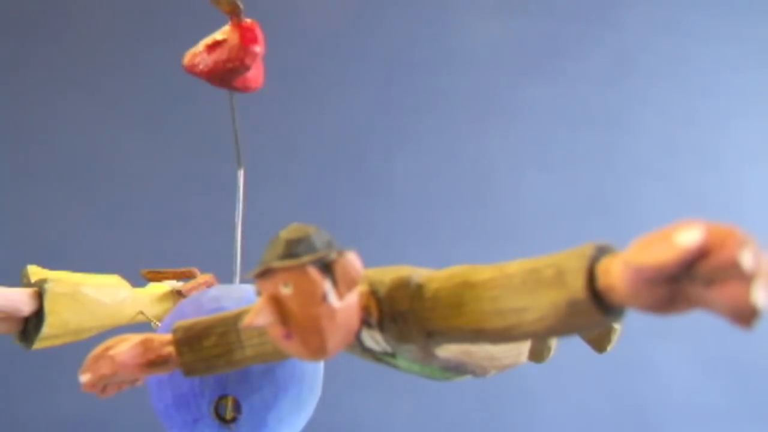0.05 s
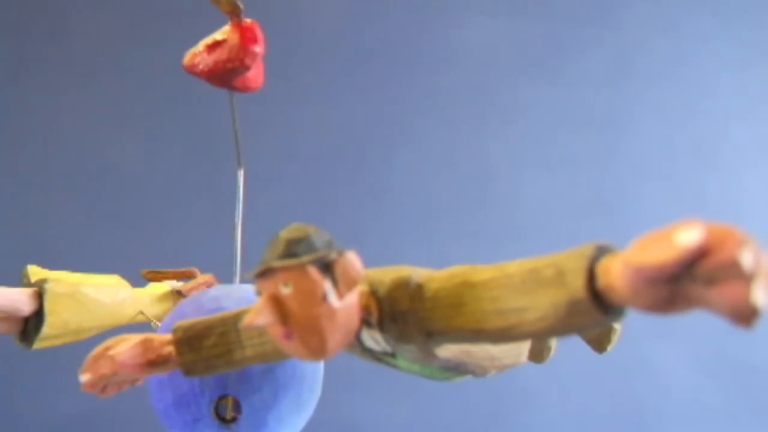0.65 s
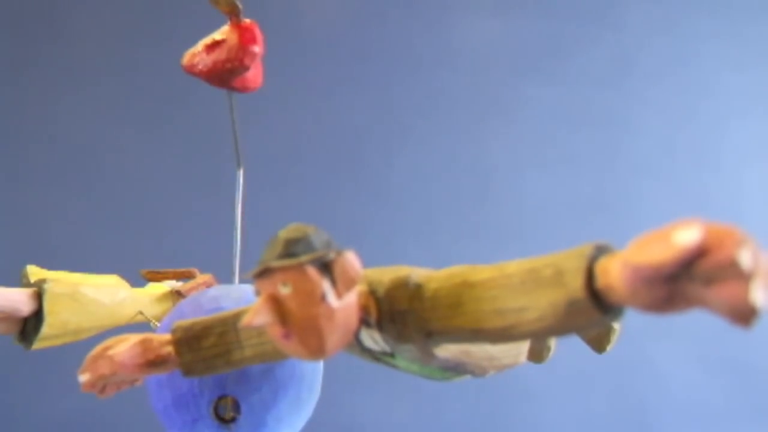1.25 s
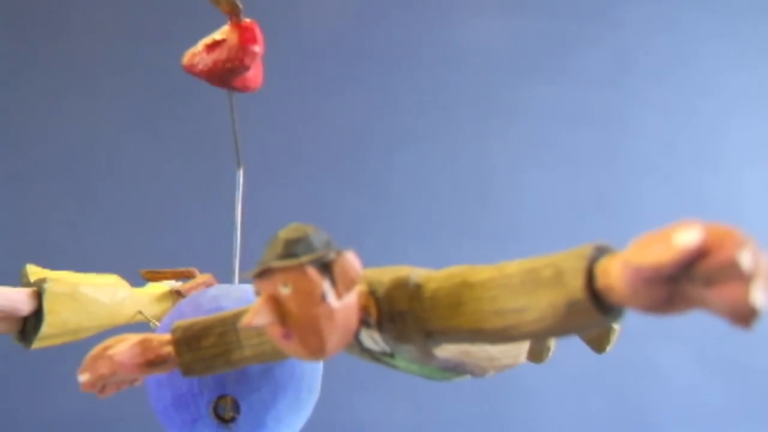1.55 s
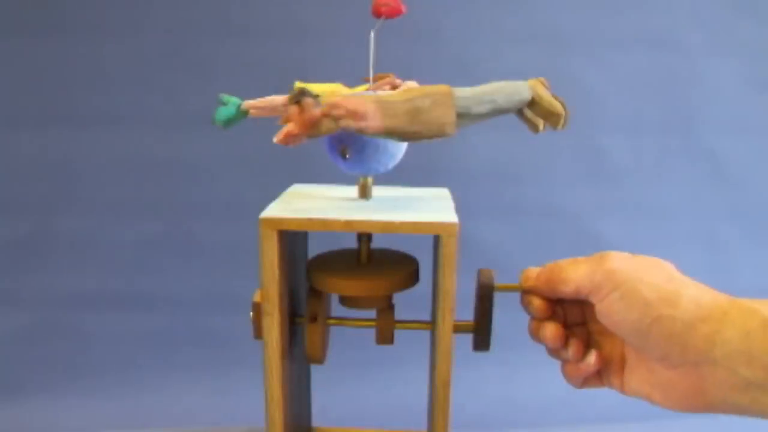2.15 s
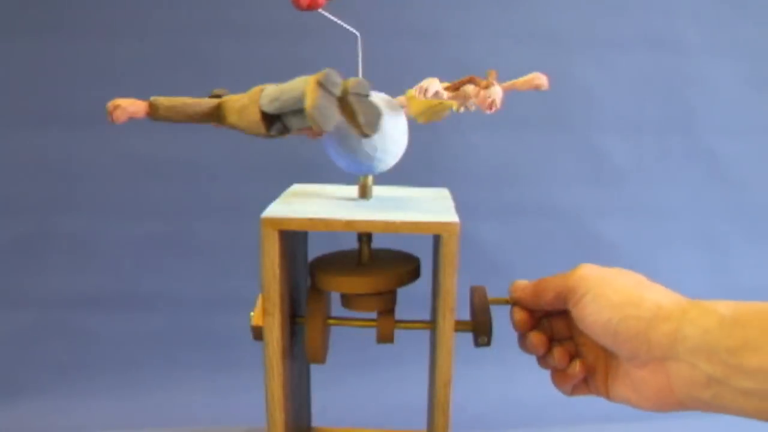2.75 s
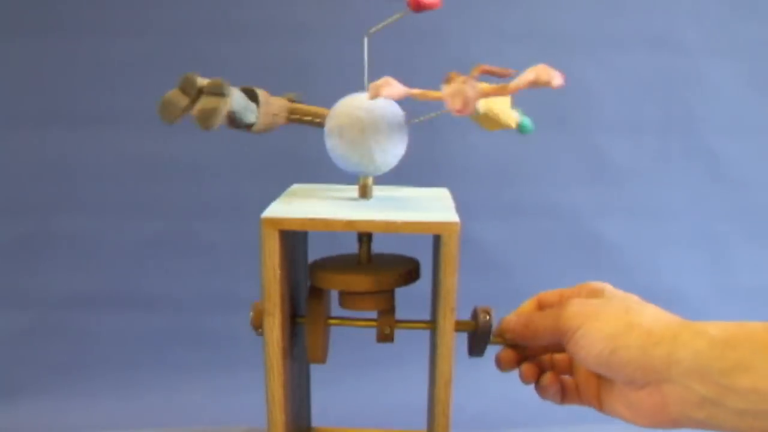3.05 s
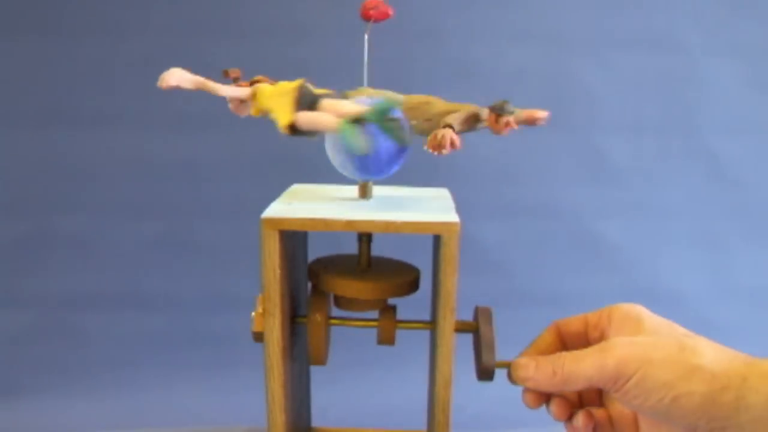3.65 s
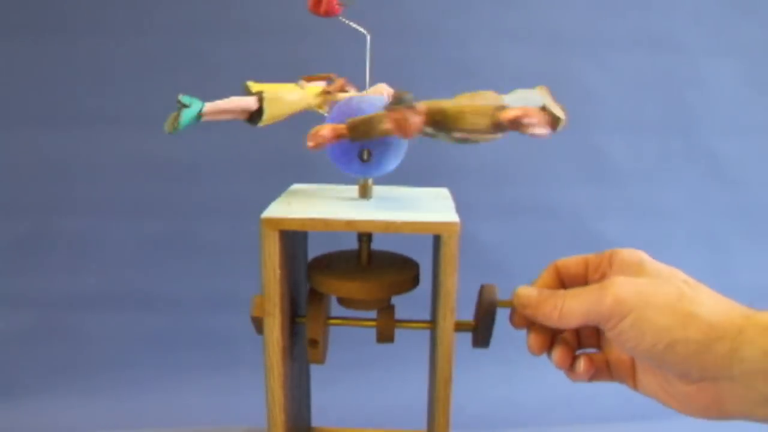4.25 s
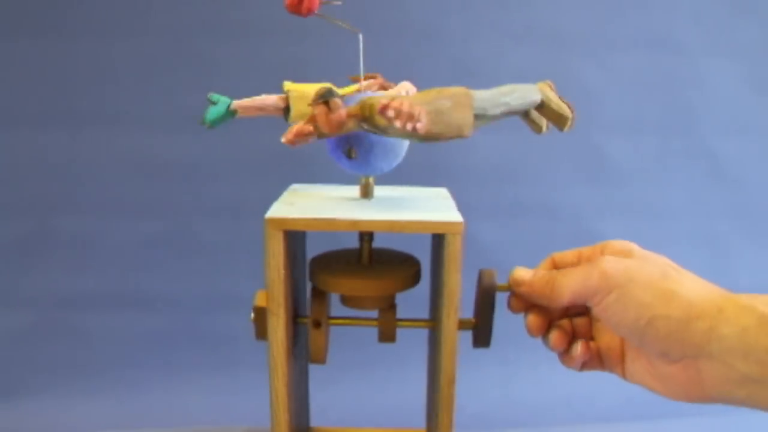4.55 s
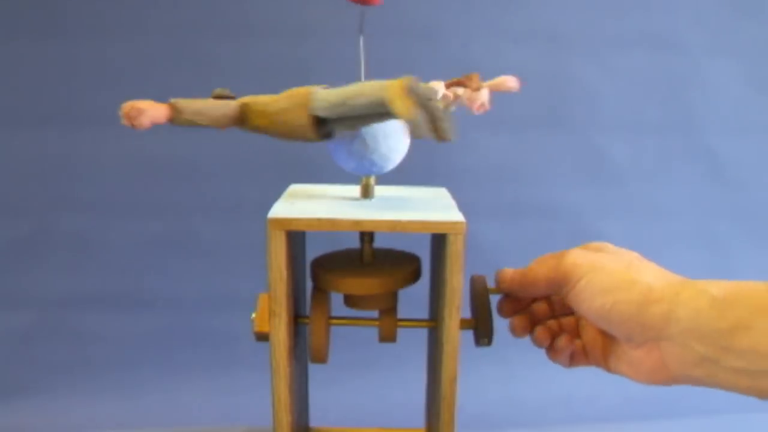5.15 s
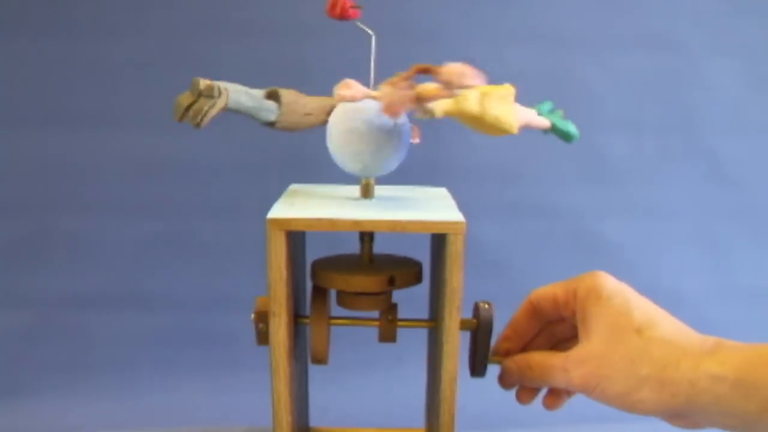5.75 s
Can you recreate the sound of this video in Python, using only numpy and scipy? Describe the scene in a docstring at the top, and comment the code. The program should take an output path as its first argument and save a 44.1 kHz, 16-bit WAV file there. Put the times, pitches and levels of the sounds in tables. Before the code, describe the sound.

A small mono microphone in a quiet room picks up steady hiss, then close handling noise: sliding skin, tiny squeaks, low thuds and loud, sharp clicks on its plastic case. After a short fade out and back in, a wooden automaton is cranked by hand. Its wheels rub faintly with occasional soft bumps and clacks, and thin wires touch in scattered little metallic ticks and chirps until the end.

```python
"""A hand-cranked wooden automaton, heard by a small mono camera. At first there is only a faint hiss.
After one second, fingers rub, knock, squeak and bump on the camera's case, and the grip makes it creak.
Near two seconds the sound fades out and in again. Then the crank starts to turn: wooden wheels
rub, bump and clack softly, while wire parts catch on each other with little ticks and chirps."""
import sys
import numpy as np
from scipy.fft import rfft, irfft, next_fast_len
from scipy.io import wavfile
from scipy.ndimage import map_coordinates

SR = 44100
rng = np.random.default_rng(int(sys.argv[2]) if len(sys.argv) > 2 else 0)


def dump_mix(stems):
    """Bounce the given channels to the path in sys.argv[1] as a 16-bit WAV at rate SR."""
    frames = np.atleast_2d(stems).T  # one column per channel
    limited = np.clip(frames, -1, 1)  # hard clip at full scale
    pcm = np.round(limited * 32767).astype(np.int16)
    wavfile.write(sys.argv[1], SR, pcm)


N = 255780

# Tone of the background hiss, of sliding skin and of its fine hiss.
# Each row: frequency in Hz, strength in dB.
HISS_TONE = [(12, -2), (28, 1.5), (60, -0.5), (150, -2), (370, -1), (650, -2.5), (1000, -4.5), (1500, -6),
             (2100, -7), (3000, -8.5), (4500, -10), (6000, -10), (7000, -13.5), (8000, -17)]
SKIN_TONE = [(30, -2.5), (110, -5.5), (300, -1), (600, -4.5), (1350, -2.5), (1900, -2.5), (2400, -3),
             (3100, -4.5), (3800, -6), (5000, -10.5), (7200, -15), (9000, -25)]
SKIN_HISS_TONE = [(1500, -17.5), (3500, -7), (4800, 0), (6600, 1.5), (8000, -3.5)]
# Finger strokes, the first a long light touch.
# Each row: start in seconds, level in dB, hold in seconds, hiss in dB compared with the stroke.
FINGER_STROKES = [(1.0, -47.5, 0.7043, -7.5), (1.1, -42, 0.062, 3.5), (1.255, -48, 0.017, -0.5),
                  (1.405, -46.5, .015, 1), (1.485, -42.5, 0.022, -2.5), (1.525, -37.5, 0.0207, -13.5),
                  (1.785, -49, .03, -7), (1.835, -45, .008, -8)]
# Knocks on the case. A fade time (t60 in the code) is how long a sound takes to drop 60 dB. Each row:
# start in seconds, level in dB, pitch in Hz, fade time in seconds, snap in dB compared with the knock.
CASE_KNOCKS = [(1.0055, -23.5, 2000, .0023, -20.5), (1.5366, -6.5, 896, .0033, -34),
               (1.5405, -18, 900, 0.0041, -21), (1.547, -14, 1310, .0086, -5),
               (1.5602, -22, 1900, .004, -15), (1.6575, -28.5, 1170, .017, -6),
               (1.8039, -21, 4920, 0.0025, -17.5), (1.8725, -3, 1810, .0031, -10.5),
               (1.8806, -18, 1640, .007, -8.5), (1.9336, -7.5, 2100, 0.0033, -25.5)]
# The notes the case rings at, called its modes. Each row: pitch in Hz, width in Hz, strength in dB.
CASE_MODES = [(440, 210, -5), (934, 140, -2.5), (1418, 296, 2.5), (2018, 240, -0.5), (2293, 220, -2),
              (3623, 680, -1), (4377, 330, -5.5), (5592, 380, -6), (7168, 550, -1)]
# Skin squeaks. Each row: start in seconds, level in dB, hold in seconds, first pitch in Hz,
# glide in Hz per second.
SKIN_SQUEAKS = [(1.031, -39.5, .008, 1250, -1000), (1.131, -42.5, .004, 1184, 600)]
# Bumps of hand and wood. Each row: start in seconds, level in dB, pitch in Hz, fade time in seconds.
DULL_BUMPS = [(1.092, -40, 229, 0.063), (1.106, -33.5, 124.9, 0.057), (1.434, -40, 250, .053),
              (1.537, -35.5, 256, 0.092), (1.554, -33, 198.5, 0.11), (1.872, -43, 291.4, .06),
              (3.022, -43, 299, 0.155), (3.058, -42.5, 170.4, .069), (3.11, -48, 141, .15),
              (3.239, -49.5, 155.2, 0.14), (4.899, -40.5, 199.5, 0.0626), (5.272, -43.5, 689, 0.066)]
# Creaks of the case. Each row: start in seconds, level in dB, hold in seconds.
GRIP_CREAKS = [(1.829, -38.5, .025), (1.884, -40.5, .018)]
# Tone of the wheels' rumble and of their dry scrape. Each row: frequency in Hz, strength in dB.
RUMBLE_TONE = [(30, -4.5), (110, 2.5), (250, -3.5), (400, -0.5), (700, -4.5), (1500, -13), (3000, -21.5),
               (9000, -38)]
SCRAPE_TONE = [(200, -19.5), (1000, -4), (1700, 2.5), (2400, -4), (3000, 2.5), (3800, -6.5), (5000, -5),
               (6100, 1), (7500, -7.5)]
# Long rubs as the wheels swing the figures round.
# Each row: start in seconds, rumble in dB, hold in seconds, scrape in dB compared with the rumble.
WHEEL_RUBS = [(2.97, -55, 0.419, -4), (4.45, -59.5, .18, 6.5), (5.22, -60.5, .42, -1)]
# Wire ticks. Each row: start in seconds, level in dB, fade time in seconds, second wire's share (0 to 1).
WIRE_TICKS = [(2.512, -43.5, 0.044, 0.97), (2.53, -45, .054, .9), (2.775, -36.5, 0.0345, .9),
              (2.863, -46.5, .03, 1), (3.0202, -33.5, 0.043, 0.04), (3.031, -33.5, .021, 0),
              (3.069, -43, .015, 0.04), (3.099, -40.5, 0.0305, 0), (3.257, -41, 0.0464, .2),
              (3.281, -45, .036, .2), (3.35, -46, .02, .2), (3.372, -43.5, 0.032, .3),
              (3.389, -43.5, .02, .7), (3.4737, -37.5, 0.0148, 0.94), (3.924, -43, 0.0355, 1),
              (4.462, -44.5, .03, .2), (4.519, -43, .022, .2), (5.104, -43.5, .04, .3),
              (5.113, -44, .04, .7), (5.142, -48, .035, 0.5), (5.171, -44.5, 0.0173, .5),
              (5.257, -48, .025, 0), (5.296, -41.5, 0.017, .5), (5.379, -44.5, 0.046, 0.2),
              (5.577, -49, .04, .5)]
# The notes the two wires and the wood ring at. Each row: pitch in Hz, width in Hz, strength in dB.
FIRST_WIRE_MODES = [(3374, 110, -6), (4832, 100, -6), (5882, 105, 0), (7163, 200, -5.5)]
SECOND_WIRE_MODES = [(4870, 150, -5), (5352, 230, 0), (5932, 130, -6.5), (6556, 250, -1.5), (6912, 150, -4),
                     (7246, 150, 0)]
WOOD_MODES = [(330, 150, -4), (716, 140, 1), (1201, 340, -1.5), (1538, 280, -3), (1880, 250, -1.5),
              (3100, 500, -13.5)]
# Wheel clacks. Each row: start in seconds, level in dB, favoured pitch in Hz, fade time in seconds.
WHEEL_CLACKS = [(3.038, -46, 2100, 0.079), (3.392, -48, 1500, .04), (4.69, -48, 1794, 0.078),
                (4.899, -44.5, 1200, 0.115), (5.562, -45.5, 1096, 0.108), (5.578, -47.5, 1345, 0.24)]
# How the camera dulls high sounds. Each row: frequency in Hz, change in dB.
CAMERA_TREBLE = [(7000, 0), (7400, -4.5), (7800, -14.0), (8200, -32.5)]
TOP_HZ = 8400  # the camera hears nothing higher


def amp(db):
    """Turn decibels into a number to multiply by."""
    return 10 ** (np.asarray(db) / 20)


def unit(x):
    """Scale a sound to an average (rms) level of 1."""
    return x / np.sqrt(np.mean(x ** 2) + 1e-20)


def tone_gain(tone, hz):
    """Read a tone table smoothly between its rows, as a number to multiply by."""
    row_hz, row_db = np.transpose(tone)
    return amp(np.interp(np.log(hz + 1), np.log(row_hz + 1), row_db))


def wobble(rate):
    """A smooth curve through `rate` random values a second."""
    return map_coordinates(rng.standard_normal(int(N * rate / SR) + 4), [np.arange(N) * rate / SR])


def filtered(x, response):
    """Turn each frequency of a sound up or down, as response(hz) says."""
    size = next_fast_len(len(x) + SR // 4)
    return irfft(rfft(x, size) * response(np.fft.rfftfreq(size, 1 / SR)), size)[:len(x)]


def resonances(modes):
    """The response of an object that rings at these notes."""
    return lambda hz: sum(amp(db) * 1j * hz * width / (pitch ** 2 - hz ** 2 + 1j * hz * width)
                          for pitch, width, db in modes)


def favour(modes, bright_hz, spread_hz):
    """The spot that is touched mostly wakes the notes near one pitch."""
    return lambda hz: resonances(modes)(hz) / (1 + ((hz - bright_hz) / spread_hz) ** 2)


def coloured(x, tone):
    """Give a sound this tone, at an average level of 1."""
    return unit(filtered(x, lambda hz: tone_gain(tone, hz)))


def slips(rate, spread_db):
    """Friction: about `rate` tiny slips a second, of uneven size."""
    slipping = rng.random(N) < rate / SR
    return unit(slipping * rng.standard_normal(N) * amp(spread_db * rng.standard_normal(N)))


def decay(t60):
    """A quarter second of loudness that drops 60 dB every t60 seconds."""
    return 1000 ** (-np.arange(SR // 4) / SR / t60)


def ring(hz, t60):
    """A pure note that dies away."""
    return decay(t60) * np.sin(2 * np.pi * hz * np.arange(SR // 4) / SR)


def burst(t60, response, rise=1e-5):
    """A puff of filtered noise that swells and dies, with as much energy as decay(t60)."""
    fall = decay(t60)
    onset = 1 - np.exp(-np.arange(len(fall)) / SR / rise)
    noise = onset * fall * rng.standard_normal(len(fall))
    return unit(filtered(noise, response)) * np.sqrt(np.mean(fall ** 2))


def swell(start, attack, hold, t60):
    """Loudness that rises, holds, then dies away; all times are in seconds."""
    t = np.arange(N) / SR - start
    return np.clip(t / attack, 0, 1) * 1000 ** (-np.maximum(t - attack - hold, 0) / t60)


def rubbing(rows, attack, t60):
    """Two loudness curves for overlapping rubs: the main sound and its brighter part."""
    power = np.array([(amp(db) * swell(start, attack, hold, t60)) ** 2 for start, db, hold, _ in rows])
    bright = amp([row[-1] for row in rows]) ** 2
    return np.sqrt(power.sum(axis=0)), np.sqrt(bright @ power)


def add(track, start, sound):
    """Mix a sound into the track at `start` seconds."""
    part = track[round(start * SR):][:len(sound)]
    part += sound[:len(part)]


def background_hiss():
    """A steady, faint background hiss."""
    return amp(-49) * coloured(rng.standard_normal(N), HISS_TONE)


def fingers():
    """Skin slides over the case in tiny slips, with a fine hiss on top."""
    slide_gain, hiss_gain = rubbing(FINGER_STROKES, attack=.0253, t60=.16)
    slide = slide_gain * coloured(slips(rate=15000, spread_db=2), SKIN_TONE)
    hiss = hiss_gain * coloured(slips(rate=19000, spread_db=0), SKIN_HISS_TONE)
    return slide + hiss


def knocks():
    """The seam snaps, then the knock lands: a pulse, a crack and a faint rattle ring in the case."""
    out = np.zeros(N)
    crack = lambda t60: burst(t60, lambda hz: (hz > 1200) & (hz < TOP_HZ))
    for start, db, hz, t60, snap_db in CASE_KNOCKS:
        snap_t60, snap_lead_s = 1.2 * t60, min(.33 * t60, .0027)
        snap = ring(hz=3700, t60=snap_t60) + amp(-.5) * crack(snap_t60)
        rattle = amp(-27.5) * burst(.056, resonances([(hz, hz, 0)]))
        add(out, start - snap_lead_s, amp(db + snap_db) * snap)
        add(out, start, amp(db) * (ring(hz, t60) + amp(-15) * crack(t60) + rattle))
    return filtered(out, resonances(CASE_MODES))


def squeaks():
    """Skin sticks and slips at a shaky, gliding pitch, with a softer note an octave up."""
    out = np.zeros(N)
    glide_s = .06
    for start, db, hold, first_hz, glide in SKIN_SQUEAKS:
        hz = first_hz + glide * np.clip(np.arange(N) / SR - start, 0, glide_s)
        phase = 2 * np.pi * np.cumsum(hz * (1 + .04 * wobble(450))) / SR
        flutter = amp(3.2 * wobble(260))
        tone = unit(flutter * (np.sin(phase) + amp(-7) * np.sin(2 * phase)))
        out += amp(db) * swell(start, attack=.02, hold=hold, t60=.19) * tone
    return out


def bumps():
    """A soft touch of hand or wood gives a low thud that dies quickly."""
    out = np.zeros(N)
    for start, db, hz, t60 in DULL_BUMPS:
        noise = amp(-7.5) * burst(t60, resonances([(hz, hz, 0)]))
        add(out, start, amp(db) * (ring(hz, t60) + noise))
    return out


def creaks():
    """A tighter grip makes the plastic case creak at its seam."""
    grip = sum(amp(db) * swell(start, attack=.019, hold=hold, t60=.06) for start, db, hold in GRIP_CREAKS)
    seam = lambda hz: resonances(CASE_MODES)(hz) * resonances([(2150, 1100, 0)])(hz)
    return grip * unit(filtered(slips(rate=5000, spread_db=2.5), seam))


def wheels():
    """The crank gets up to speed; wooden wheels rumble and scrape on each other, louder in long rubs."""
    start_s, speed_up_s = 2.2, .33
    speed = np.clip((np.arange(N) / SR - start_s) / speed_up_s, 0, 1)
    rub_rumble, rub_scrape = rubbing(WHEEL_RUBS, attack=.099, t60=.4)
    rumble_gain = np.hypot(amp(-62) * speed, rub_rumble)  # steady turning plus the rubs
    scrape_gain = np.hypot(amp(-66.5) * speed, rub_scrape)
    rumble = rumble_gain * coloured(slips(rate=2500, spread_db=3.5), RUMBLE_TONE)
    scrape = scrape_gain * coloured(slips(rate=3000, spread_db=3), SCRAPE_TONE)
    return rumble + scrape


def wires():
    """Two wires catch and scrape, bounce once, and ring on faintly at their lower notes."""
    out = np.zeros(N)
    bounce_delays_s = .035 * rng.uniform(.54, 1.4, len(WIRE_TICKS))
    for (start, db, t60, share), delay in zip(WIRE_TICKS, bounce_delays_s):
        for modes, part in ((FIRST_WIRE_MODES, 1 - share), (SECOND_WIRE_MODES, share)):
            gain = amp(db + .95) * np.sqrt(part)
            contact = favour(modes, bright_hz=6350, spread_hz=1770)
            lower_notes = favour(modes, bright_hz=4200, spread_hz=1500)
            after_ring = amp(-12.5) * burst(.17, lower_notes, rise=.0046)
            add(out, start, gain * (burst(t60, contact, rise=.002) + after_ring))
            add(out, start + delay, gain * amp(-12.5) * burst(t60, contact, rise=.0022))
    return out


def clacks():
    """Now and then the wooden wheels clack in their loose bearings."""
    out = np.zeros(N)
    for start, db, bright_hz, t60 in WHEEL_CLACKS:
        add(out, start, amp(db) * burst(t60, favour(WOOD_MODES, bright_hz, spread_hz=.55 * bright_hz)))
    return out


def scene():
    """Add up all the sounds, the same on the left and the right."""
    mono = background_hiss() + fingers() + knocks() + squeaks() + bumps() + creaks()
    mono += wheels() + wires() + clacks()
    return np.array([mono, mono])


def record(dry):
    """The camera shifts the wave slightly off zero and dulls the highs; the sound fades out and in."""
    offset = -.0024
    silent_from_s, silent_to_s, fade_out_s, fade_in_s = 1.9704, 2.034, .0866, .2264
    t = np.arange(N) / SR
    fade_out = amp(.5) * np.clip((silent_from_s - t) / fade_out_s, 0, 1)
    fade_in = amp(-.3669) * np.clip((t - silent_to_s) / fade_in_s, 0, 1)
    faded = (dry + offset) * (fade_out + fade_in)
    dull_highs = lambda hz: tone_gain(CAMERA_TREBLE, hz) * (hz < TOP_HZ)
    return np.array([filtered(channel, dull_highs) for channel in faded])


dry = scene()
out = record(dry)
dump_mix(out)
```